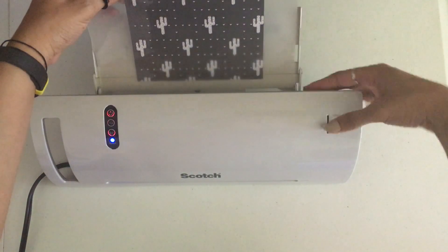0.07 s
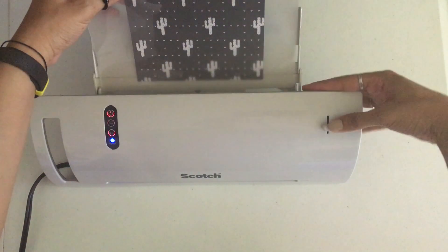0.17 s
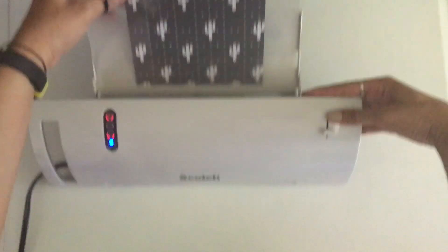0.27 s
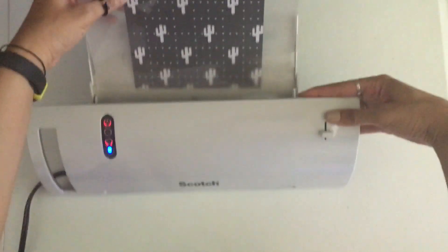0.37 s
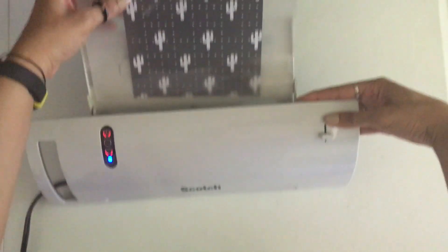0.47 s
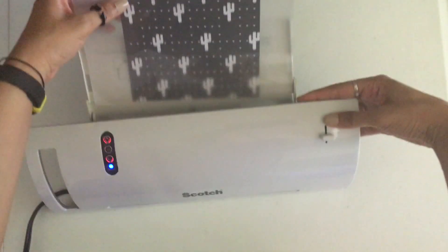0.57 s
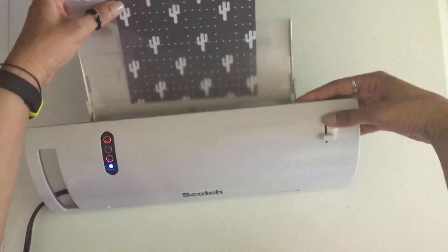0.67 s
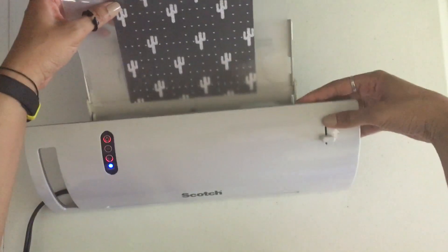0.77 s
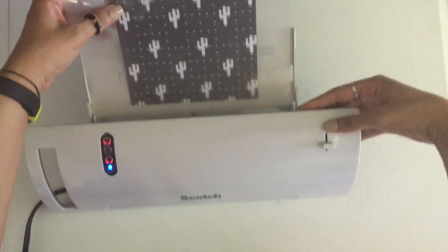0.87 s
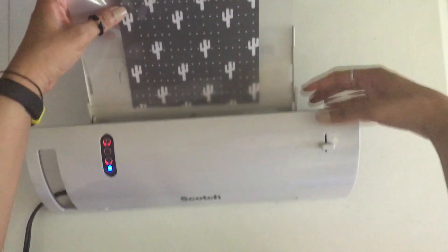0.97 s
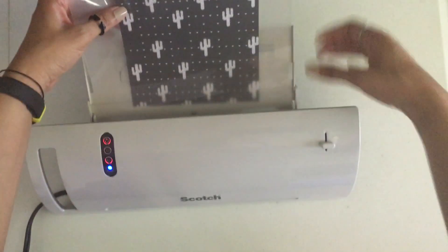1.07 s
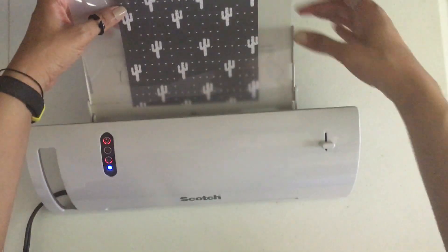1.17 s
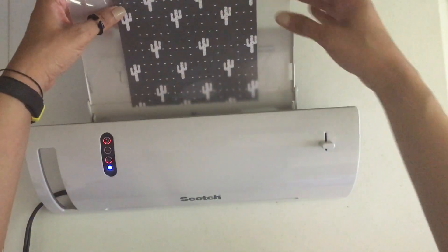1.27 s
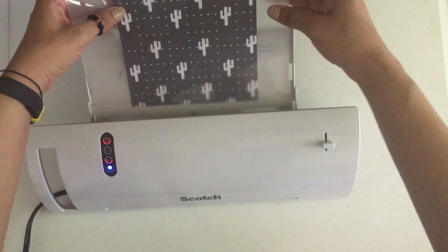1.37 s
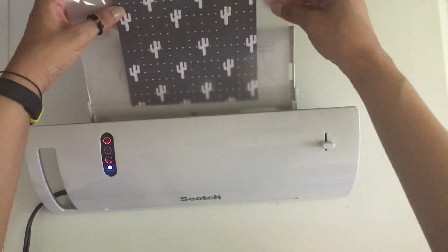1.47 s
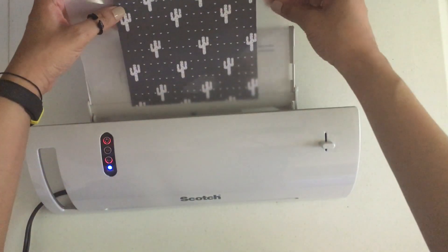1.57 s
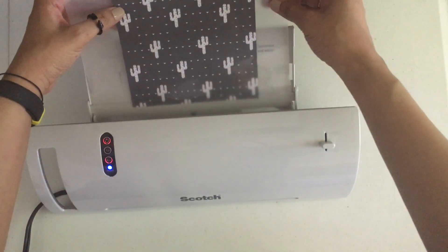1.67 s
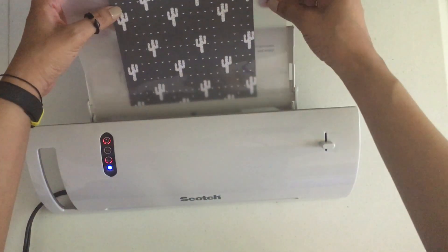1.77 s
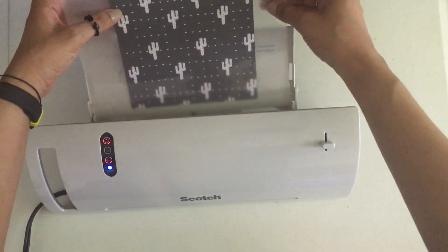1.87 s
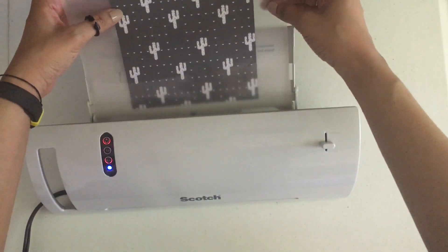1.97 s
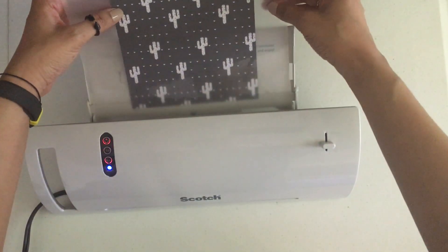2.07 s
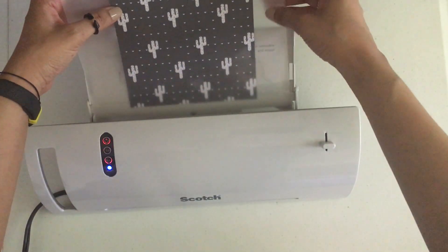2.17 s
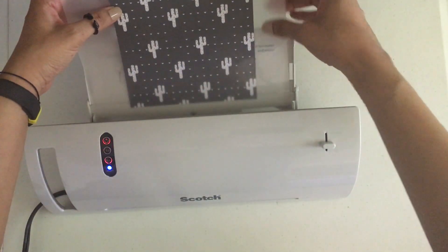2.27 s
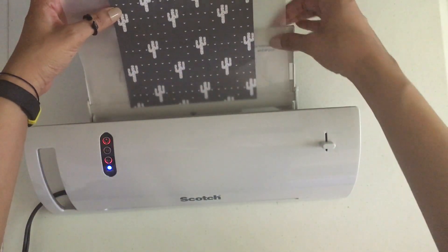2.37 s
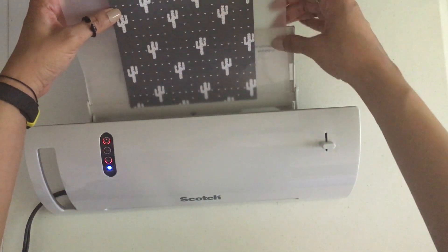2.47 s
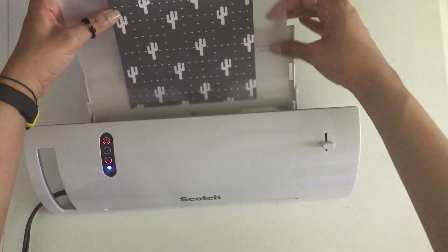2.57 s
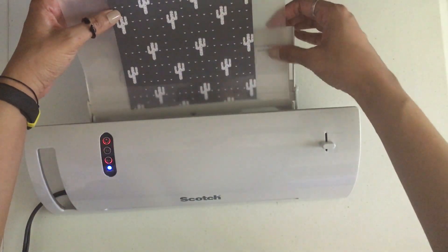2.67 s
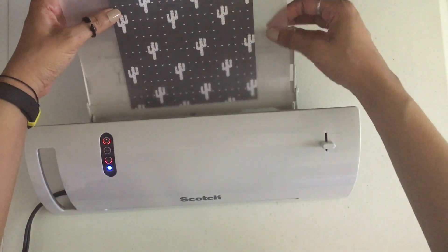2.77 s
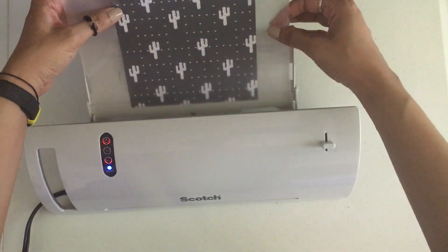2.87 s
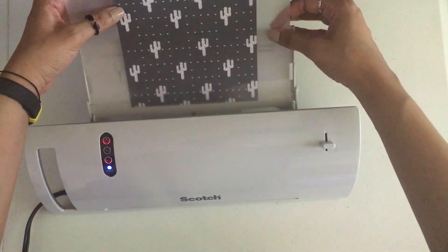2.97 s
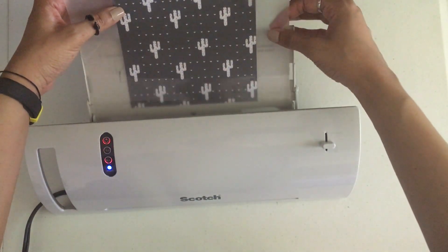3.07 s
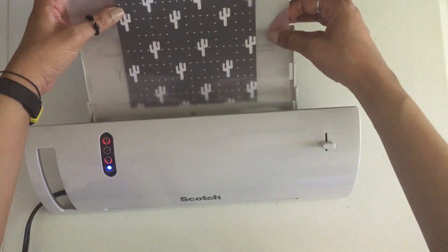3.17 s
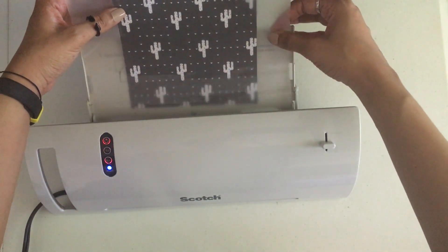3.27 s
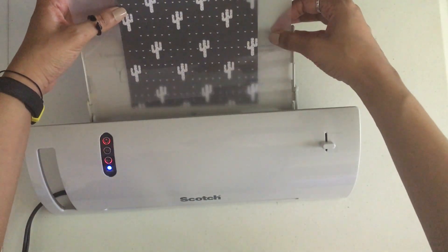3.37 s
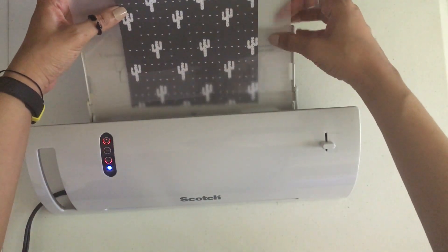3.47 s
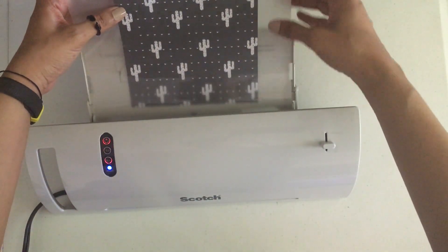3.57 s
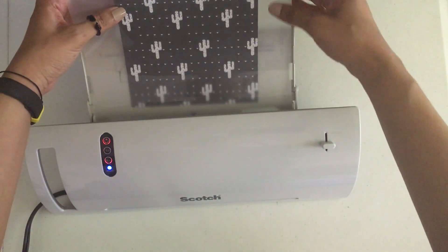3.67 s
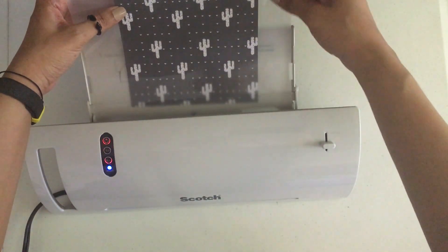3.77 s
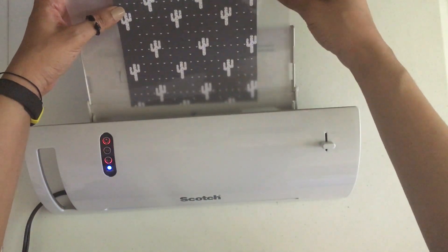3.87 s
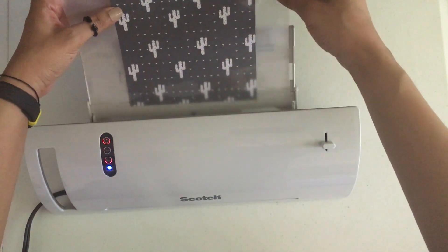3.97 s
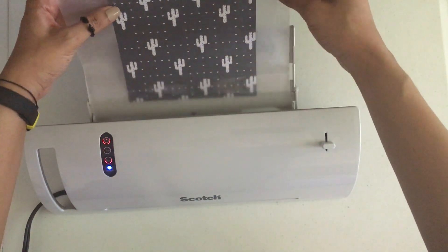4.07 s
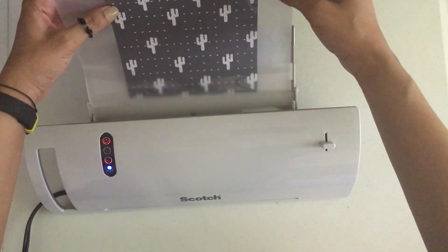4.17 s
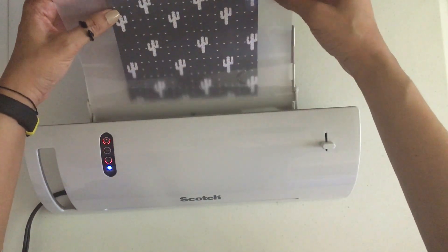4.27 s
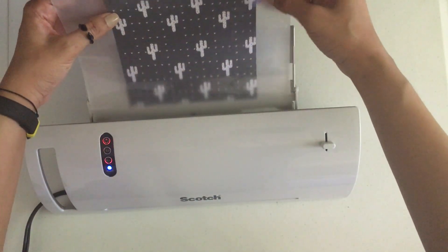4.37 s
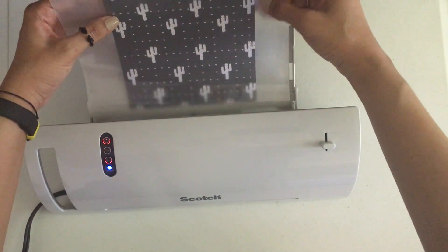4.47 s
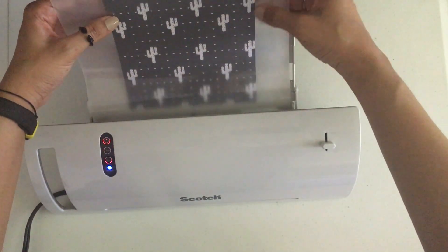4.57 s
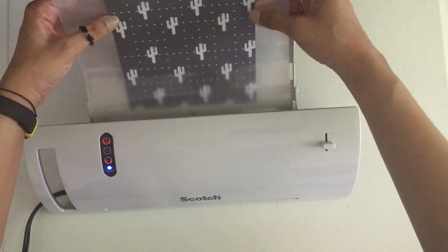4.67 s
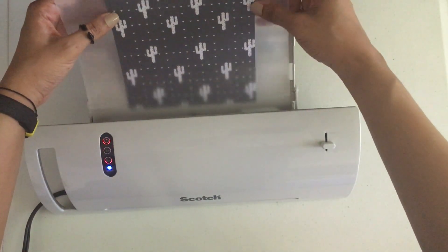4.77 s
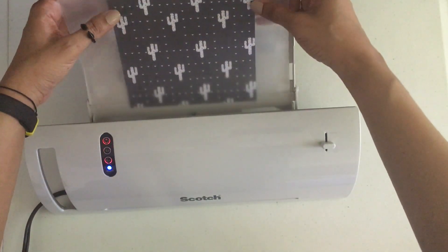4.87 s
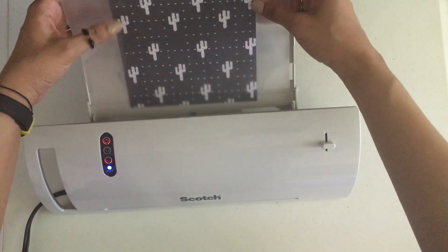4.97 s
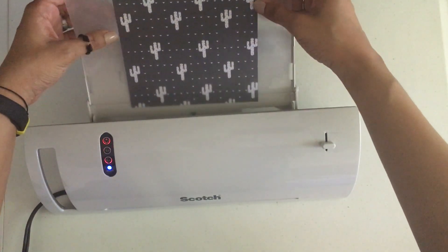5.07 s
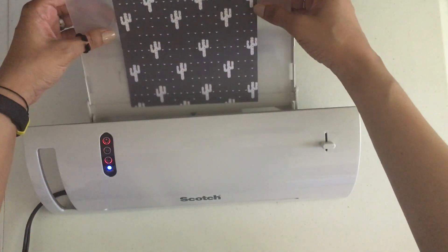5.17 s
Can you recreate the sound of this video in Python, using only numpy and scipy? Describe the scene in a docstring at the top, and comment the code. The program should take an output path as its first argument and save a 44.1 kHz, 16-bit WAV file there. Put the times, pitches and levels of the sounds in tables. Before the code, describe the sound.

A laminator on a table gives a deep, steady mains hum with low rumble over a faint airy room fan. Within the first second a hand grips and shifts it: low thumps, a short stuttering scrape, and the hum dips. Two more thumps set it down and the hum returns. Then fingers quietly rub and crackle a plastic pouch. Close, dry, mono indoor pickup.

```python
"""A laminator hums on a table top, its motor rumbling below, near a steady room fan of coloured noise.
A hand grips the machine with a crackle and a rub, and the hum is muted for about a second. Pitch-falling
swings of the table top make the thumps as it is set down; stuttering slips through the shell modes make
the drag. Then fingers rub and crackle a plastic pouch: flickering hiss, snaps and dull puffs of noise."""
import sys
import numpy as np
from scipy import signal
from scipy.fft import rfft, irfft, next_fast_len
from scipy.io import wavfile
from scipy.ndimage import uniform_filter1d

SR = 44100
rng = np.random.default_rng(int(sys.argv[2]) if len(sys.argv) > 2 else 0)


def master(y):
    """Save y as 16-bit WAV."""
    cut = np.clip(np.atleast_2d(y).T, -1, 1)
    pcm = np.round(cut * 32767)  # scale
    wavfile.write(sys.argv[1], SR, pcm.astype(np.int16))


N = 230775

# how firmly the machine drives the table top: (t/s, level/dB relative to standing free)
CONTACT = [(0, -5.5), (.22, 2), (.27, -7.5), (.68, -11), (.75, -12), (.9, -13.5), (1.13, -5.5), (1.3, -2),
           (5.3, -2)]
# hum partials before the contact level: (multiple of the hum pitch, level/dB rms)
HUM_PARTIALS = [(1, -35.5), (2, -65.5), (3, -70.5)]
# colour of the table rumble under the motor: (f/Hz, level/dB per Hz, relative)
RUMBLE_COLOUR = [(15, -10), (37, 9.5), (65, 1), (80, 6.5), (92, 3), (105, 14.5), (135, 3), (155, 0),
                 (175, -15.5), (220, -52)]
# colour of the fan's airy noise: (f/Hz, level/dB per Hz, relative)
FAN_COLOUR = [(150, -32.5), (200, -8.5), (300, -16.5), (430, -19.5), (517, -16.5), (650, -17), (940, -21),
              (1200, -15), (1290, -21), (1380, -15.5), (1600, -19.5), (1860, -16.5), (2200, -23.5),
              (3000, -28.5), (4200, -31), (5000, -37.5), (6200, -39.5), (7200, -45), (10400, -46),
              (13100, -49), (16000, -61)]
# crackles of plastic: (t/s, nominal level/dB peak, pitch f/Hz, fall away from the pitch/dB per octave)
CRACKLES = [(0.2965, -34, 3400, 19), (.441, -46, 1790, 14), (0.4824, -47, 1750, 17),
            (0.5625, -42, 1780, 2.5), (0.5807, -45, 4930, 3), (0.5874, -52, 6000, -5),
            (.5917, -47, 10000, 4), (0.6547, -55, 5070, 0.5), (.7941, -43.5, 2390, 11.5),
            (.9522, -47, 1800, 20), (1.0027, -43.5, 1820, 8), (1.0548, -42, 2300, 5.5),
            (1.1833, -53.5, 1800, 6), (1.384, -56, 5000, 11), (1.4352, -31.5, 1810, 8.5),
            (1.4434, -51, 2170, 25), (1.585, -40, 4900, 5.5), (1.642, -66, 9000, 5), (1.714, -63, 11000, 6),
            (1.72, -48, 1950, 8), (1.834, -45, 9900, 2), (2.0077, -52, 2800, 11),
            (2.2548, -45.5, 4440, 12.5), (2.634, -46, 2030, 4), (2.8365, -46, 3370, 3.5),
            (2.855, -49, 4240, 9), (2.8853, -47.5, 1900, 2.5), (2.897, -51, 1800, 5),
            (3.023, -54.5, 1770, 4), (3.078, -57, 5500, 8), (4.3484, -55, 1210, 4), (4.4988, -39, 4370, 18),
            (4.5013, -37.5, 2150, 5), (4.5231, -43, 1730, 2.5), (4.537, -45, 800, 12),
            (4.829, -49.5, 7000, 6), (4.8634, -64, 9000, 2), (4.883, -56, 9000, 9), (4.9462, -45, 5000, 11)]
# resonances of the plastic: (low f/Hz, high f/Hz)
PLASTIC_BANDS = [(1300, 2450), (2700, 3890), (4100, 6420), (8000, 12600)]
# fingers fumbling with the film between strokes, before swishes: (t/s, hiss level/dB rms)
FUMBLE = [(0, -98), (.3, -72.5), (.75, -68.5), (1.1, -70.5), (1.25, -80), (1.55, -71.5), (1.8, -70),
          (2.08, -79), (2.25, -71.5), (2.5, -83), (2.7, -74.5), (3.0, -75.5), (3.2, -83), (3.75, -79.5),
          (3.95, -77.5), (4.2, -71), (4.7, -77), (5.2, -70.5)]
# colour of skin on film: (f/Hz, level/dB per Hz, relative)
RUB_COLOUR = [(1500, -2), (2500, 2.5), (4000, -1.5), (6200, -3), (8000, -9), (10000, -11), (12500, -16),
              (16000, -20.5)]
# distinct strokes on film and shell: (t/s, length/s, hiss level/dB rms, lift of the treble/dB)
STROKES = [(0.297, 0.04, -67, 5), (0.422, 0.046, -63.5, 5), (0.48, 0.17, -66, 1), (0.996, 0.035, -59, 6),
           (1.378, 0.038, -61, -3), (1.416, 0.015, -60, 0), (1.564, 0.034, -66, -1), (1.894, 0.087, -65, 3),
           (1.968, 0.056, -70, 3), (2.421, 0.088, -66, 7), (2.603, 0.15, -70.5, 4), (2.853, 0.088, -67, 6),
           (2.951, .06, -70.5, 0), (3.012, .055, -66.5, -9), (3.522, 0.04, -70.5, -4),
           (3.835, 0.16, -71, 0), (4.07, .1, -72, -5), (4.174, 0.073, -73.5, 4), (4.315, 0.14, -68, 3),
           (4.447, .18, -62, 5.5), (4.815, 0.078, -76, 3)]
# thumps of the table top: (t/s, nominal level/dB peak, nominal pitch f/Hz, length until damped/s,
# rap of the shell, relative level/dB)
THUMPS = [(0.303, -16, 88.2, 0.058, -19.5), (0.386, -28, 94, 0.025, -47.5), (0.437, -30.5, 92, 0.034, -56),
          (.495, -27.5, 90, 0.048, -49), (0.551, -20.5, 101, 0.043, -29.5),
          (.59, -30.5, 104.6, 0.064, -37.5), (0.642, -41, 76.7, 0.091, -67), (0.958, -24, 84.3, 0.066, -27),
          (1.059, -17, 114, 0.026, -25), (1.104, -28.5, 116, 0.015, -42)]
# modes of the plastic shell left free: (f/Hz, level/dB relative, t60/s)
SHELL_MODES = [(195, 1, .12), (250, 1, .12), (300, -5, .08), (430, -7, .05), (720, -9, .04),
               (950, -19, .04), (1200, -27, .03), (351, -7, .07), (525, -4, .09), (615, -5, .1),
               (851, -8, .09), (1845, -19, .05)]
# feet scraping the table, speeding up and slowing down: (t/s, level/dB rms)
DRAG = [(.37, -68), (.412, -49), (.46, -46.5), (.478, -44), (.51, -34.5), (.535, -40.5), (.56, -44.5),
        (.6, -47), (.66, -51), (.7, -68)]
# soft bumps of the pouch on the tray: (t/s, length/s, level/dB rms)
BUMPS = [(0.701, 0.033, -56.5), (0.813, 0.031, -55.5), (1.151, 0.062, -57.5), (1.574, .058, -59),
         (1.954, 0.089, -58.5), (2.632, 0.043, -54.5), (2.812, 0.026, -59), (2.878, 0.05, -54.5),
         (2.97, 0.051, -58.5), (3.019, 0.019, -57), (3.554, 0.022, -58), (4.346, 0.015, -52),
         (4.489, 0.052, -55), (4.534, 0.037, -54.5), (4.836, 0.065, -55)]
# tone of the microphone: (f/Hz, level/dB)
MIC_TONE = [(10, -21), (30, -7.5), (45, 0.5), (4300, -1.5), (4940, -2.5), (5500, -1), (9400, 0.5),
            (10400, -5.5), (11300, -1.5), (20000, 1)]

HUM_HZ = 120.
RUMBLE_DB, FAN_DB = -46, -60  # rms; the rumble also follows the contact
CRACKLE_T60_S, CRACKLE_RISE_S = 0.024, 0.0018
RING_DB, RING_CYCLES = 1.5, 44  # a snap's ring is down 60 dB after this many cycles
# small crackles at chance moments; their level is over the fumbling hiss, their fall is per octave
FAINT_PER_S, FAINT_DB, FAINT_SPREAD_DB, FAINT_FALL_DB = 6, 7, 1.5, 6
SWISH_DB = 2.5  # rms wander of the fumbling level
BUMP_LO_HZ, BUMP_HI_HZ = 353, 1190
EDGE_HZ = 15800  # top of the microphone's band


def gain_of(db):
    """Turns decibels into a linear gain."""
    return 10 ** (np.asarray(db) / 20)


def evened(x):
    """Scales a signal to rms 1."""
    return x / np.sqrt(np.mean(x ** 2) + 1e-20)


def curve(rows, axis=1):
    """Reads one column of a timed table at every sample."""
    rows = np.array(rows)
    return np.interp(np.arange(N) / SR, rows[:, 0], rows[:, axis])


def read(points, hz):
    """Reads a colour in dB at the given frequencies, along a log frequency axis."""
    f, db = np.transpose(points)
    return np.interp(np.log(hz + 1), np.log(f + 1), db)


def add(mix, s, sound):
    """Lays a sound into the mix at a time in seconds, cut at the end."""
    part = mix[round(s * SR):][:len(sound)]
    part += sound[:len(part)]


def band(x, lo_hz, hi_hz):
    """Keeps one frequency band."""
    edges = [lo_hz, min(hi_hz, SR / 2.2)]
    return signal.sosfilt(signal.butter(2, edges, "band", fs=SR, output="sos"), x)


def noise(colour, patchy_db, size=1024):
    """Random short-time spectra with the given colour and drifting patches, rms 1."""
    frames, hz = 4 * N // size + 5, np.fft.rfftfreq(size, 1 / SR)
    real, imag, patches = rng.standard_normal((frames, len(hz), 3)).T
    patches = uniform_filter1d(patches, 12, 0)  # smooth over frequency
    patches = evened(uniform_filter1d(patches, 10, 1))  # and over time
    spectra = (real + 1j * imag) * gain_of(read(colour, hz)[:, None] + patchy_db * patches)
    return evened(signal.istft(spectra, nperseg=size, noverlap=3 * size // 4)[1][:N])


def ring(x, damping=1):
    """The plastic shell rings in a few short modes; a hand on it shortens them."""
    t = np.arange(6000) / SR
    modes = np.zeros(len(t))
    for hz, db, t60 in SHELL_MODES:
        modes += gain_of(db - 60 * damping * t / t60) * np.sin(2 * np.pi * hz * t)
    return signal.oaconvolve(x, modes / abs(modes).max())[:len(x)]


def swell(length):
    """Rises quickly and fades more slowly."""
    u = np.arange(0, 1, 1 / (length * SR))
    return np.sin(np.pi * u ** 0.72) ** 0.83


def machine():
    """Mains hum with overtones and a motor rumble, both radiated by the table top."""
    t = np.arange(N) / SR
    hum = np.zeros(N)
    for multiple, db in HUM_PARTIALS:
        turns = multiple * HUM_HZ * t + rng.random()
        hum += np.sqrt(2) * gain_of(db) * np.sin(2 * np.pi * turns)
    contact_db = curve(CONTACT)
    # the rumble follows the contact by half as many dB
    rumble = gain_of(RUMBLE_DB + .5 * contact_db) * noise(RUMBLE_COLOUR, 0, size=8192)
    return gain_of(contact_db) * hum + rumble


def fan():
    """Steady broadband fan noise whose colour drifts slightly in patches."""
    return gain_of(FAN_DB) * noise(FAN_COLOUR, 1.0)


def faint_crackles(middles):
    """Small crackles at chance moments, as rows like CRACKLES, that follow the fumbling level."""
    when, size, place = rng.random((round(FAINT_PER_S * N / SR), 3)).T
    db = curve(FUMBLE)[(when * N).astype(int)] + FAINT_DB - FAINT_SPREAD_DB * np.log(size)
    hz = middles[1] * (middles[-1] / middles[1]) ** place
    return list(zip(when * N / SR, db, hz, np.full(len(when), FAINT_FALL_DB)))


def crackles():
    """Each snap is a sharp tick, a short ring and a fast-dying rattle of noise, mostly strongest near its pitch."""
    out, t = np.zeros(N), np.arange(3000) / SR
    middles = np.sqrt(np.prod(PLASTIC_BANDS, axis=1))
    rise = np.minimum(t / CRACKLE_RISE_S, 1)
    tails = [.16, 0.09, 0.15, .07]  # t60/s of the faint tail in each resonance
    ticks = [band(signal.unit_impulse(len(t), 60), *edges) for edges in PLASTIC_BANDS]
    ticks = [tick / abs(tick).max() for tick in ticks]
    for s, db, hz, fall_db in list(CRACKLES) + faint_crackles(middles):
        ring_level = gain_of(db + RING_DB - 60 * t * hz / RING_CYCLES)
        add(out, s, rise * ring_level * np.sin(2 * np.pi * hz * t))
        levels = gain_of(db - fall_db * abs(np.log2(middles / hz)))
        for level, tick, tail, edges in zip(levels, ticks, tails, PLASTIC_BANDS):
            grain = evened(band(rng.standard_normal(len(t)), *edges))
            fade = gain_of(-60 * t / CRACKLE_T60_S) + gain_of(-14.5 - 60 * t / tail)
            add(out, s, level * (1.04 * tick + 0.53 * rise * fade * grain))
    return out


def rub():
    """Skin on film: a hiss that flickers with tiny slips, faint while fingers fumble, louder in strokes."""
    flicker = gain_of(2.2 * evened(uniform_filter1d(rng.standard_normal(N), 120)))
    hiss = noise(RUB_COLOUR, 1.5, size=512) * evened(flicker)
    treble = band(hiss, 7500, 19000)
    strokes, lift = np.zeros(N), np.zeros(N)
    for s, length, db, lift_db in STROKES:
        stroke = gain_of(db) * swell(length)
        add(strokes, s, stroke)
        add(lift, s, stroke * (gain_of(lift_db) - 1))
    # the fumbling comes and goes in swishes
    swish_db = SWISH_DB * evened(uniform_filter1d(rng.standard_normal(N), size=2500))
    fumbling = gain_of(curve(FUMBLE) + swish_db)
    return (fumbling + strokes) * hiss + lift * treble


def thumps():
    """The table swings for a few cycles until hand and feet damp it; the shell raps just before."""
    out, raps = np.zeros(N), np.zeros(N)
    for s, db, hz, length, rap_db in THUMPS:
        u = np.arange(0, 1, 1 / (length * SR))
        swing = np.sin(np.pi * u ** .48)  # swells faster than it fades
        sag = hz * (1.15 - 0.41 * u)  # the pitch falls as the weight settles
        turn = 2 * np.pi * np.cumsum(sag) / SR
        # the feet rattle against the top, which adds overtones early in the swing
        rattle = gain_of(-16.5 - 3.2 * u) * np.sin(2.13 * turn)
        rattle += gain_of(-22.0 - 19 * u) * np.sin(3.7 * turn)
        add(out, s, gain_of(db) * swing * (np.sin(turn) + rattle))
        add(raps, s - .004, gain_of(rap_db) * signal.windows.hann(40) / 20)
    return out + ring(raps, damping=1.38)


def drag():
    """Uneven slips of the rubber feet come in stutters and excite the shell."""
    stutter = gain_of(3.5 * evened(uniform_filter1d(rng.standard_normal(N), 300)))
    slip_size = gain_of(3.0 * np.minimum(rng.exponential(1, N), 4)) * rng.standard_normal(N)
    slips = slip_size * (rng.random(N) < 1500 / SR)  # about 1500 slips per second
    start, end = DRAG[0][0], DRAG[-1][0]
    moving = np.zeros(N)
    add(moving, start, signal.windows.tukey(round((end - start) * SR), .2))
    # the weight of the hand holds the lowest modes still
    scrape = band(ring(slips * stutter), 228, 3900)
    return gain_of(curve(DRAG)) * moving * evened(scrape)


def bumps():
    """The pouch on the tray makes dull puffs of noise, under two octaves wide."""
    level = np.zeros(N)
    for s, length, db in BUMPS:
        add(level, s, gain_of(db) * swell(length))
    return level * evened(band(rng.standard_normal(N), BUMP_LO_HZ, BUMP_HI_HZ))


def scene():
    """Mixes all layers into one channel."""
    return (machine() + fan() + crackles() + rub() + thumps() + drag() + bumps())[None]


def record(dry):
    """The microphone loses the deepest bass and has two dips in the treble; then the band limit."""
    size = next_fast_len(N + SR)
    tone = gain_of(read(MIC_TONE, np.fft.rfftfreq(size, 1 / SR)))
    coloured = irfft(rfft(dry, size) * tone, size)[:, :N]
    band_limit = signal.firwin(511, EDGE_HZ, window=("kaiser", 9), fs=SR)
    return signal.oaconvolve(coloured, band_limit[None], "same")


dry = scene()
out = record(dry)
master(out)
```